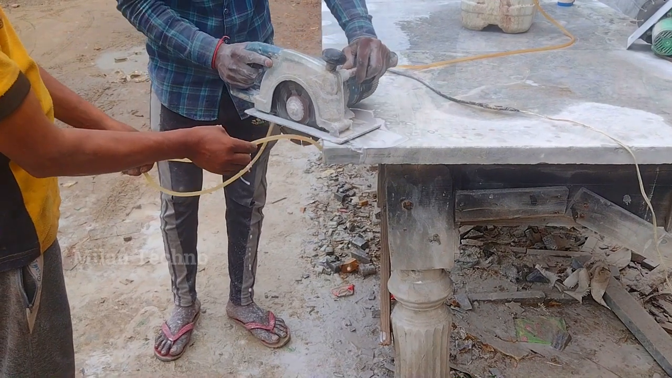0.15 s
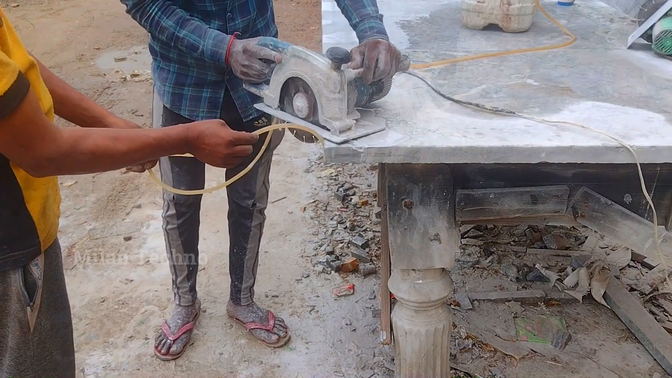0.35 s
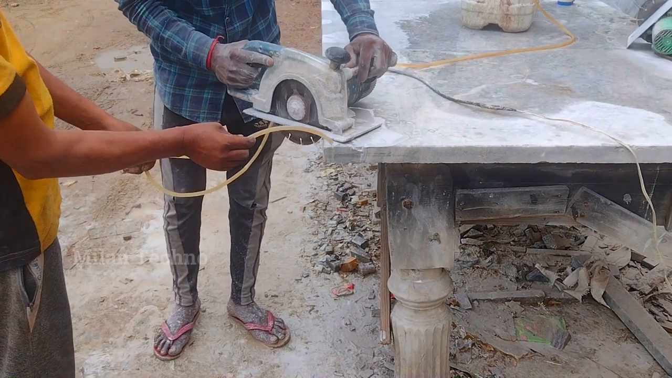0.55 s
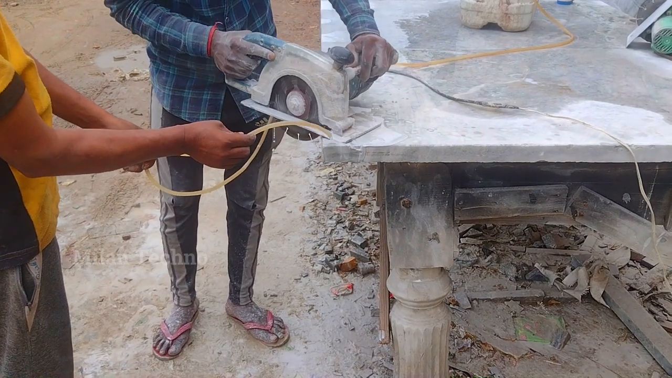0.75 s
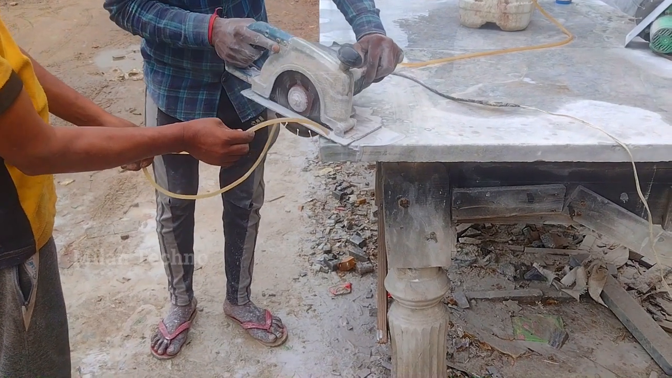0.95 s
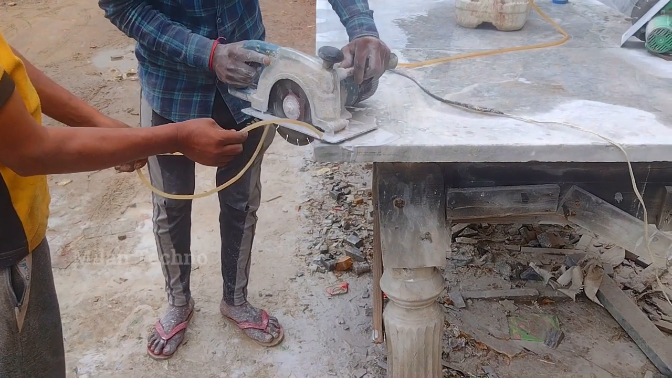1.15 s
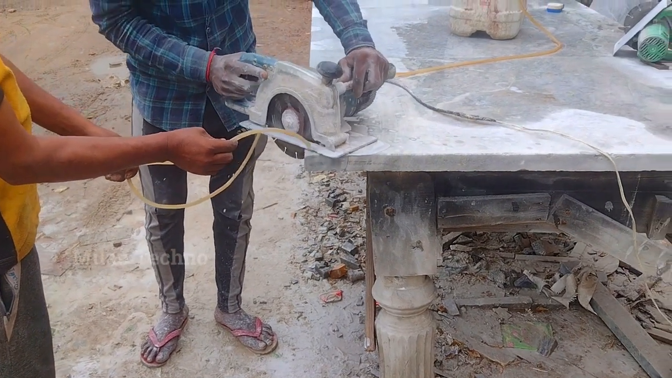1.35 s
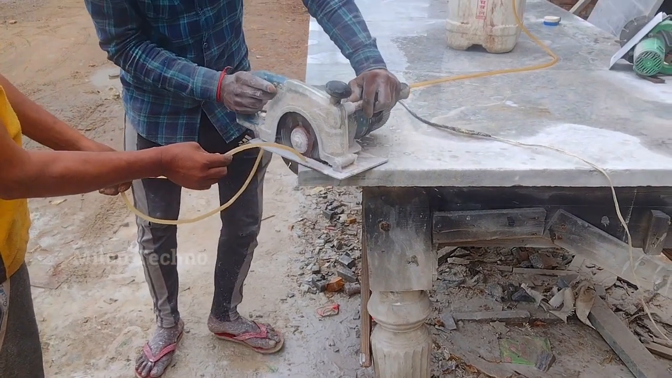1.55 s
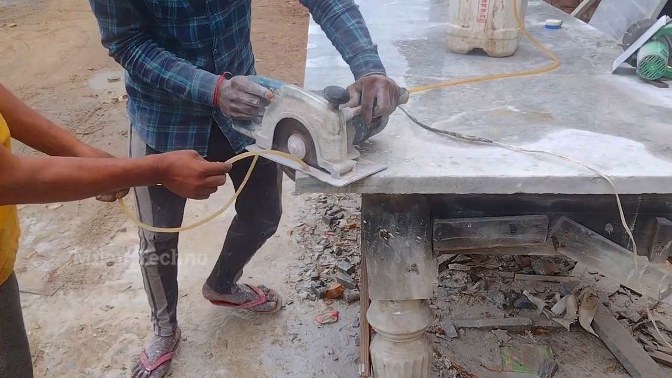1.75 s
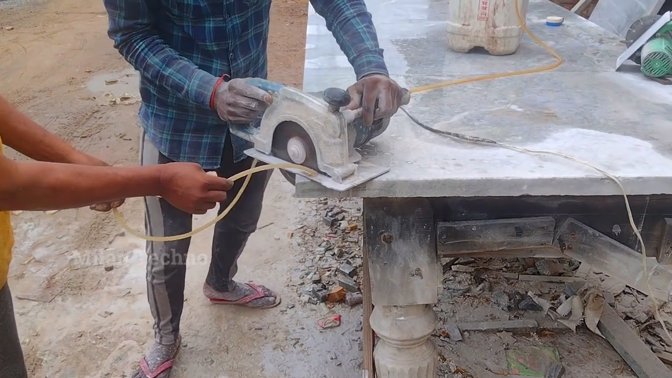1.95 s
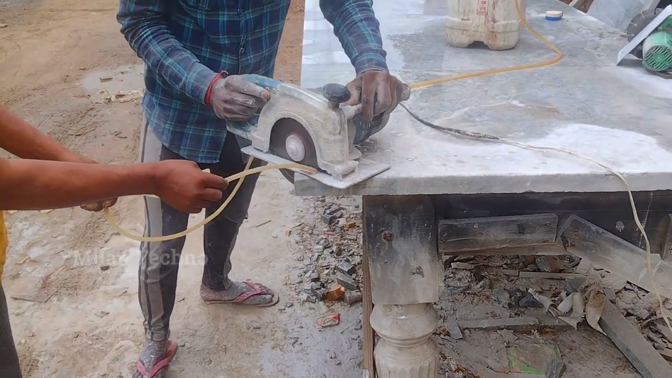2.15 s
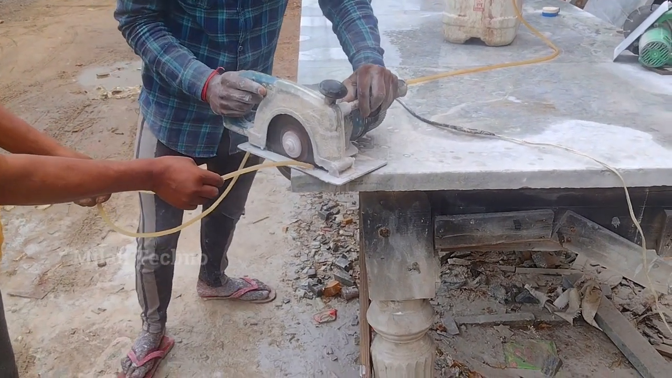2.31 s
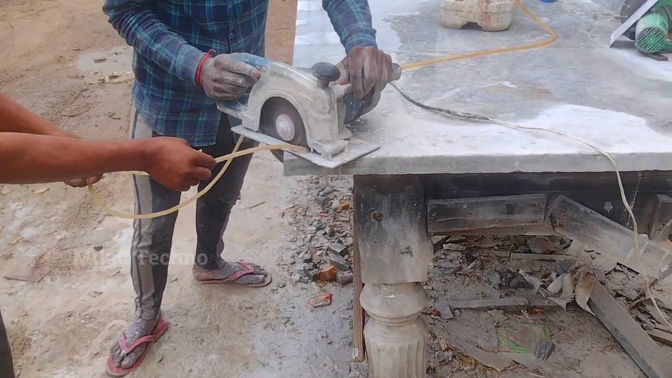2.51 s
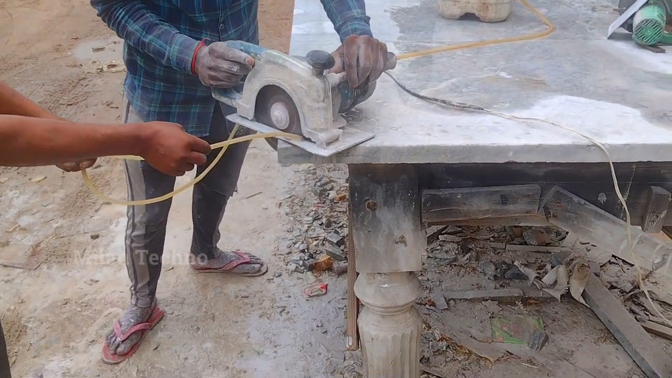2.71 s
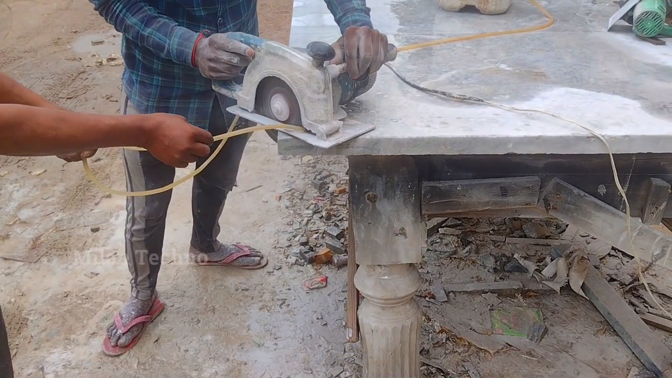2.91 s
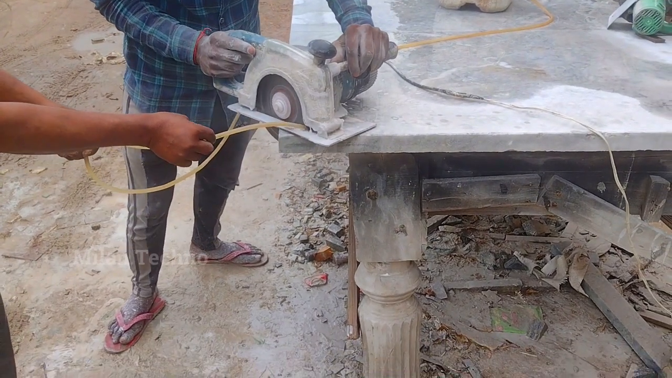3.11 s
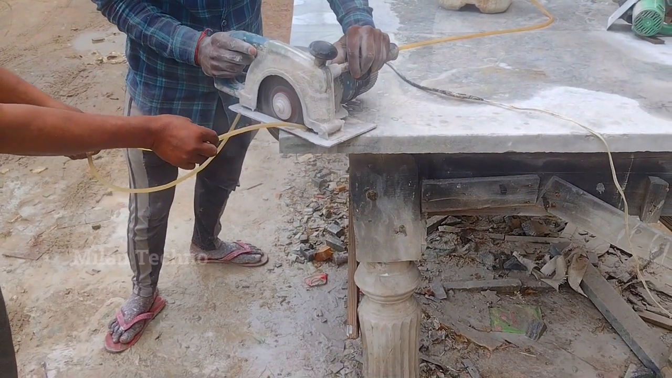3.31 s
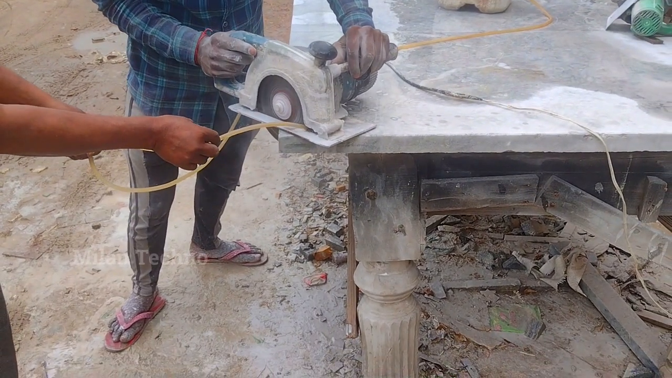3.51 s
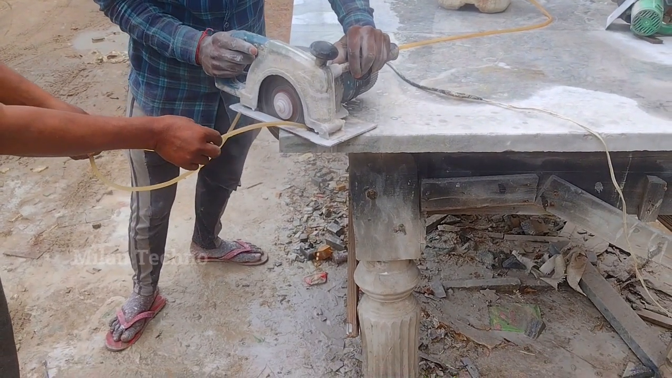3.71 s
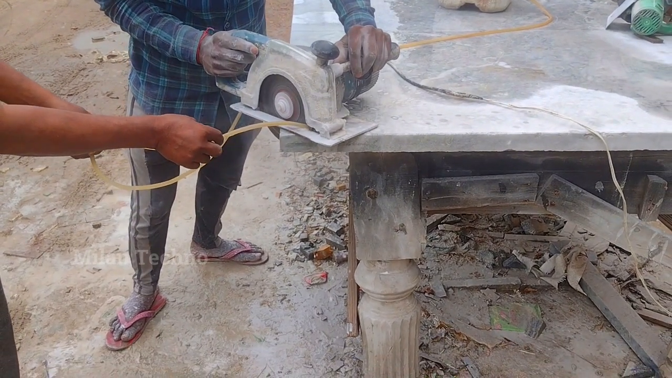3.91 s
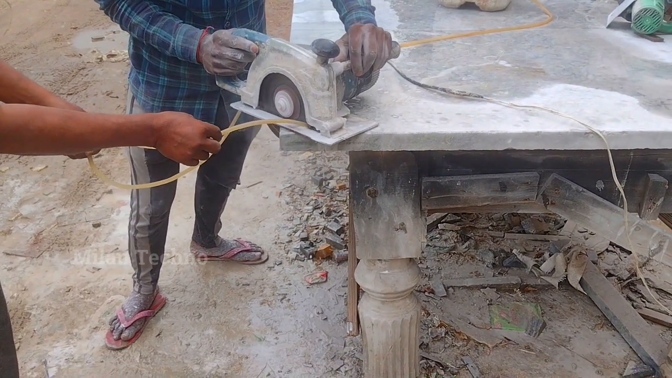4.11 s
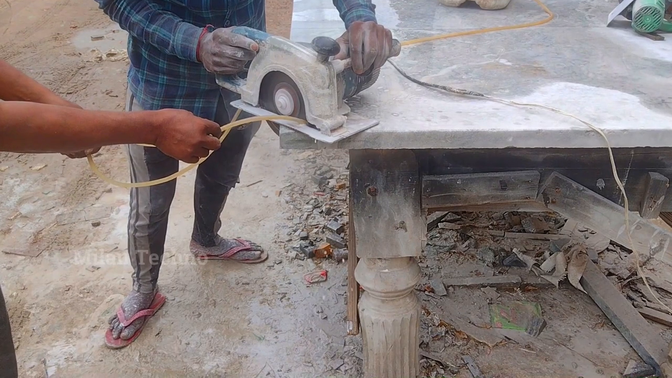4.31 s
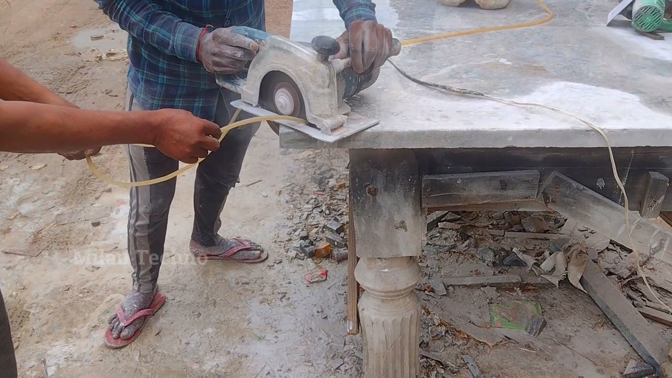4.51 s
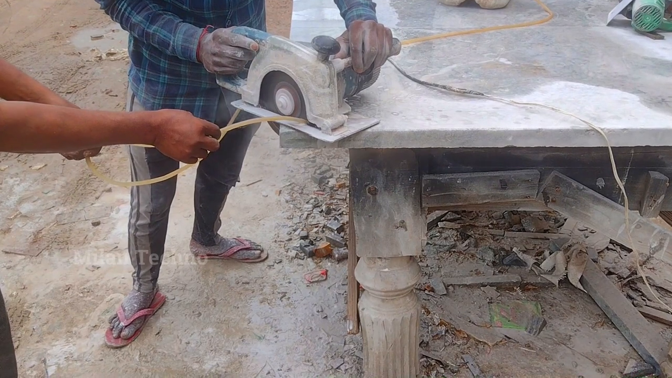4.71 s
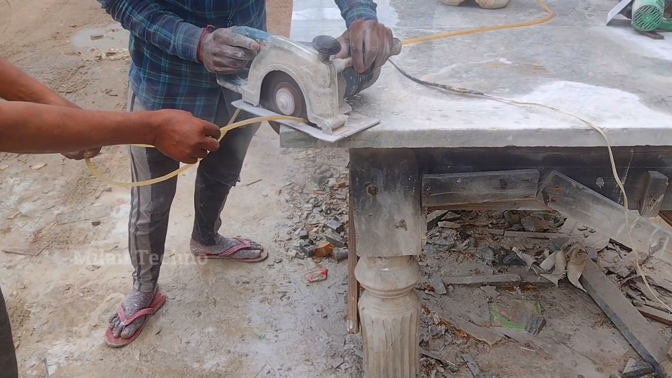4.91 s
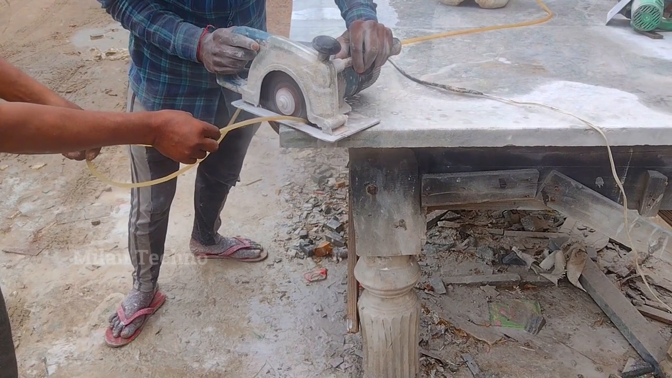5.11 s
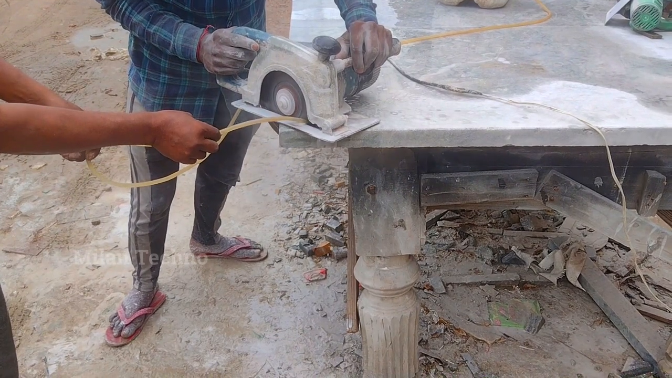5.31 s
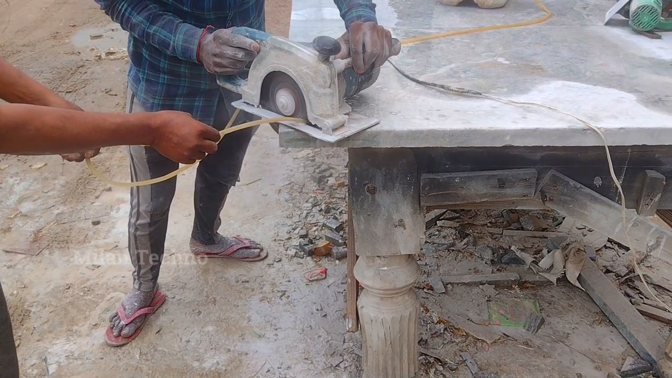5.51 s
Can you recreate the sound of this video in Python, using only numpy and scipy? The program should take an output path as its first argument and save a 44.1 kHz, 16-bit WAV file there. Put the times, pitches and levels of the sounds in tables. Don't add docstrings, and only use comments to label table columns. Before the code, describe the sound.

Insects trill as a metal plate clacks and drags over gritty stone; then a saw snaps on and roars into bright, ringing cutting hiss.

```python
import sys
import numpy as np
from scipy import signal
from scipy.fft import rfft, irfft
from scipy.io import wavfile

SR = 44100
rng = np.random.default_rng(int(sys.argv[2]) if len(sys.argv) > 2 else 0)


def voltage_ratio(decibels):
    exponent = np.asarray(decibels, float) / 20
    return 10 ** exponent


def digitize_waveform(pressure):
    field = np.atleast_2d(pressure).T
    bounded = np.clip(field, -1, 1)
    quanta = np.round(bounded * 32767).astype(np.int16)
    wavfile.write(sys.argv[1], SR, quanta)


N = 244755
T = np.arange(N) / SR
HZ = np.maximum(np.arange(N // 2 + 1) * SR / N, 1)
SWITCH_ON_S = 1.79
PORT_LAG_S = .000155

# start in seconds, plate level in dB, tick level in dB, ring t60 in seconds.
KNOCKS = [(0.297, -16, -22.5, 0.067), (0.314, -13.5, -34, 0.12), (0.613, -20.5, -29, 0.15),
          (0.677, -29, -44, 0.076), (0.706, -32, -53, 0.19), (0.82, -33, -30, 0.049),
          (0.841, -31.5, -72, 0.13), (0.893, -32.5, -62, 0.073), (1.036, -13.5, -30, 0.093),
          (1.075, -26.5, -52, 0.64), (1.121, -17, -34, 0.048), (1.19, -61, -29, 0.09),
          (1.275, -35, -32, 0.47), (1.328, -21.5, -50, 0.047), (1.513, -31, -65, 0.19),
          (1.543, -27, -34, 0.12), (1.605, -58, -32, 0.068), (1.628, -16, -51, 0.13),
          (1.725, -28, -43, 0.15), (1.79, -13.5, -23, 0.18)]


def rms_one(x):
    return x / np.sqrt(np.mean(x ** 2) + 1e-20)


def in_time(rows):
    s, *columns = np.transpose(rows)
    return [np.interp(T, s, c) for c in columns]


def at_hz(points, hz):
    table_hz, values = np.array(points).T
    return np.interp(np.log(hz), np.log(table_hz), values)


def drift(rate):
    r = np.exp(-80 * np.pi * rate / SR)
    noise = rng.standard_normal(N // 40 + 2002)
    slow = signal.lfilter([1], [1, -2 * r, r * r], noise)[2000:]
    return np.interp(np.arange(N) / 40, np.arange(len(slow)), rms_one(slow))


def fading(time_s):
    return np.exp(-np.maximum(T - SWITCH_ON_S, 0) / time_s)


def band(x, low_hz, high_hz):
    edges = [low_hz, min(high_hz, .45 * SR)]
    return signal.sosfilt(signal.butter(2, edges, "band", fs=SR, output="sos"), x)


def ports(x, pan_db, lag_s):
    n = np.arange(N)
    late = np.interp(n - lag_s * SR, n, x)
    return np.array([x * voltage_ratio(pan_db / 2), late * voltage_ratio(-pan_db / 2)])


def yard():
    # frequency in Hz, level in dB per Hz.
    colour = [(25, -16), (45, 3), (70, 1), (150, -6), (400, -12.5), (900, -18), (2000, -19.5),
              (4000, -24.5), (5500, -44), (9000, -32), (10500, -70)]
    both, *own = rfft(rng.standard_normal((3, N)))
    alike = 0.95 / (1 + (HZ / 900) ** 2)
    mixed = np.sqrt(alike) * both + np.sqrt(1 - alike) * own
    return voltage_ratio(-43.5) * rms_one(irfft(voltage_ratio(at_hz(colour, HZ)) * mixed, N))


def grit(per_s, size_db):
    sizes = voltage_ratio(size_db * np.minimum(rng.exponential(1, N), 4)) * rng.choice([-1, 1], N)
    return rms_one(sizes * (rng.random(N) < per_s / SR))


def body(force, modes, spread_db):
    out = np.zeros(N)
    for k, (hz, db, t60) in enumerate(modes):
        r = voltage_ratio(-60 / (max(t60, .003) * SR))
        w = 2 * np.pi * hz / SR
        push = force * voltage_ratio(db + spread_db * drift(14.0)) * np.sqrt(1 - r * r)
        ringing = signal.lfilter([0, np.sin(w)], [1, -2 * r * np.cos(w), r * r], push + 1e-18)
        out += (-1) ** k * ringing / np.sin(w) ** .5
    return out


def contact_levels():
    # time in seconds, drag in dB.
    slide = [
        (0.0, -48.5),
        (0.3, -48.5),
        (0.47, -61),
        (0.75, -90),
        (0.84, -46),
        (1.25, -45.5),
        (1.37, -34),
        (1.64, -34),
        (1.785, -94),
    ]
    flat_landings = [1, 9, 13, 17]
    edge_thud_db, flat_thud_db, switch_thud_db = -17.5, -6, -29
    grit_db, = in_time(slide)
    plate_db = -40.5 + 1.18 * (grit_db + 45)
    slab_db = -56 + 0.1 * (grit_db + 45)
    before = T < slide[-1][0]
    clumps = voltage_ratio(2.66 * drift(34)) * before
    tick = voltage_ratio(grit_db - 3.0) * clumps
    plate = voltage_ratio(plate_db - 12.5) * clumps
    thud = voltage_ratio(slab_db - 19.0) * before
    t = np.arange(int(.4 * SR)) / SR
    for k, (s, plate_peak, tick_peak, t60) in enumerate(KNOCKS):
        if k in flat_landings:
            thud_peak = plate_peak + flat_thud_db
        elif k < len(KNOCKS) - 1:
            thud_peak = plate_peak + edge_thud_db
        else:
            thud_peak = plate_peak + switch_thud_db
        at = slice(round(s * SR), round(s * SR) + len(t))
        tick[at] += voltage_ratio(tick_peak + 3.5 - 60 * t / max(t60, .01)) * np.minimum(t / 0.0042, 1)
        plate[at] += voltage_ratio(plate_peak - 6 - 60 * t / max(1.005 * t60, .01))
        thud[at] += voltage_ratio(thud_peak - 9.5 - 60 * t / max(1.2 * t60, .01)) * np.minimum(t / 0.0038, 1)
    return tick, plate, thud


def handling():
    # frequency in Hz, level in dB, t60 in seconds.
    guard_modes = [(3020, -4.5, 0.0022), (4260, -2, 0.016), (4695, 1, 0.025), (5360, 2.5, 0.012),
                   (6280, 1.5, 0.0063), (7450, 0.5, 0.0081), (9200, -5.5, 0.0044)]
    plate_modes = [(696.5, -4, 0.087), (799, -6, 0.2), (910, -13, 0.32), (1190, 4, 0.016),
                   (1393, -11, 0.27), (1426, -4, 0.042), (1694, 3.5, 0.052), (2110, 3, 0.022),
                   (2715, -23, 0.036), (507.3, -22.5, 0.39), (1003, -24, 0.34), (1145, -24, 0.79)]
    slab_modes = [(148, -5, .11), (272, 0, .09), (355, -1, .1), (490, -6, .08), (616, -7, .08)]
    tick, plate, thud = contact_levels()
    pan = np.where(T < SWITCH_ON_S, -1.5, -10)
    scatter = np.array([grit(9000, size_db=3.5), grit(4600, size_db=7.0)])
    rasp = voltage_ratio(-2) * band(band(tick * scatter, 1800, 10000), 1500, 12500)
    rasp = rasp + voltage_ratio(4) * band(plate * scatter, 900, 4200)
    contact = grit(6000, size_db=1.5)
    tick, plate = tick * contact, plate * contact
    thud = thud * rng.standard_normal(N)
    guard = voltage_ratio(-7.5) * body(tick, guard_modes, spread_db=4.0)
    steel = voltage_ratio(-10.5) * body(plate, plate_modes, spread_db=4.0) + voltage_ratio(7.0) * band(plate, 490, 1530)
    stone = voltage_ratio(-3) * body(thud, slab_modes, spread_db=1.5) + voltage_ratio(14) * band(thud, 130, 700)
    out = rasp * voltage_ratio([pan / 2, -pan / 2])
    out += ports(guard, pan + 15.7, 0.00013)
    out += ports(steel, 0.1 * pan, 0.00017)
    return out + ports(stone, -1.8, .00005)


def insects():
    # chirps per second, start in Hz, end in Hz, chirp length in seconds, level in dB,
    # first chirp in seconds, last in seconds.
    singers = [
        (51.5, 8450, 7650, .011, -49.5, .0075, 1.8),
        (50.5, 7400, 7250, .011, -55, .002, .5),
    ]
    out = np.zeros(N)
    for rate, start_hz, end_hz, length, db, first, last in singers:
        u = np.minimum((T - first) % (1 / rate) / length, 1)
        wave = np.sin(2 * np.pi * np.cumsum(start_hz + (end_hz - start_hz) * u) / SR)
        out += voltage_ratio(db + 1.5 * drift(12)) * np.sin(np.pi * u) ** 2 * wave * (T < last)
    return ports(out, 2.0, .0001)


def snaps():
    # start in seconds, level in dB, ring in Hz, t60 in seconds.
    clicks = [(0.047, -23.5, 3900, 0.01), (.138, -26, 6000, 0.0042), (.245, -28.5, 6230, .02),
              (.397, -32, 9000, .006), (.615, -11.5, 4760, 0.082), (0.614, -18.5, 1450, 0.087),
              (1.038, -12, 1207, 0.066), (1.325, -27, 150, .15), (.678, -26, 1180, 0.099),
              (.708, -28, 1186, 0.1), (0.847, -30, 1205, .08), (.9, -32, 1210, .07),
              (.671, -32, 7000, .006), (0.888, -35, 6900, .006), (0.934, -34, 6850, 0.0051),
              (1.122, -3, 2060, 0.0023), (1.631, 8, 1120, 0.0026), (1.726, -12.5, 5640, 0.01),
              (1.79, -3, 1230, 0.023)]
    out, t = np.zeros(N), np.arange(int(.15 * SR)) / SR
    for s, db, hz, t60 in clicks:
        out[round(s * SR):][:len(t)] += voltage_ratio(db - 60 * t / t60) * np.sin(2 * np.pi * hz * t)
    return ports(out, 2.8, 0.00014)


def turns():
    # time in seconds, turns per second lost.
    feed = [
        (2.65, 0),
        (3.05, 2.9),
        (3.5, 4.9),
        (4.4, 6.5),
        (5.2, 5.4),
        (5.55, 4.2),
    ]
    free_turns_per_s, kick_turns_per_s, run_up_s = 66.5, 25, .29
    speed = free_turns_per_s - (free_turns_per_s - kick_turns_per_s) * fading(run_up_s) - in_time(feed)[0]
    return np.cumsum(speed * (1 + .0008 * drift(12))) / SR


def rim(angle, spread_db):
    orders = voltage_ratio(spread_db * rng.standard_normal(200)) * np.exp(2j * np.pi * rng.random(200))
    pattern = irfft(orders, 8192)
    passing = np.interp(angle % 1 * 8192, np.arange(8192), pattern)
    return rms_one(passing) * np.sqrt(200 * 61 / (SR / 2))


def hiss_spectra(shake):
    # centre in Hz, width in Hz.
    bands = [(1600, 300), (3160, 220), (4040, 330), (4330, 350), (4800, 450), (5670, 400), (6335, 330),
             (6800, 400), (7930, 550), (9600, 800), (13100, 600)]
    # left in dB, right in dB.
    heights = [(4, 5.6), (-8, 8.5), (6.5, 0.52), (6.5, 4.7), (4.5, 1.2), (5, 8.2), (2, 3.3), (-2, 0.95),
               (-0.5, 2.9), (-1, 4), (-20, 1.9)]
    # frequency in Hz, level in dB per Hz.
    hiss_colour = [(700, -25.5), (1400, -15), (2500, -3.5), (3500, -3.5), (4500, 1.5), (6000, -4),
                   (8000, 0.5), (11000, -3.5), (13000, -7.5), (16000, -10)]
    # frequency in Hz, left over right in dB.
    balance = [(1000, 2), (4000, -4), (6000, 7.5), (8000, 0.5), (15000, -1.5)]
    # frequency in Hz, share common to both ports.
    direct_share = [(700, 0.3), (2500, 0.05), (4000, 0.73), (5700, 0.75), (7500, 0.29), (10000, 0.11),
                    (14000, 0.053)]
    # frequency in Hz, share that repeats every turn.
    repeat_share = [(700, .05), (1300, .12), (3000, .2), (4000, .3), (6500, .25), (9000, .08), (12000, 0)]
    direct, *diffuse = rfft(rng.standard_normal((3, N)))
    repeat, again = rfft(shake), at_hz(repeat_share, HZ)
    share = np.clip(at_hz(direct_share, HZ), 0, 1)
    slab_echo = 1 + .32 * np.exp(-2j * np.pi * HZ * .00141)
    late = np.exp(-2j * np.pi * HZ * PORT_LAG_S) * slab_echo
    sides = []
    for side, path in enumerate([1, late]):
        power = 1
        for (mid, width), db in zip(bands, heights):
            power = power + voltage_ratio(2 * db[side]) / (1 + (2 * (HZ - mid) / width) ** 2) ** 2
        tilt_db = at_hz(hiss_colour, HZ) + (1.5 - side) * at_hz(balance, HZ)
        colour = voltage_ratio(tilt_db) * np.sqrt(power)
        fresh = np.sqrt(share) * direct * path + np.sqrt(1 - share) * diffuse[side]
        sides.append(colour * (np.sqrt(again) * repeat * path + np.sqrt(1 - again) * fresh))
    return np.array(sides)


def blade_hiss(angle, shake):
    load_db = -16.5 - 11 * fading(0.076)
    sides = hiss_spectra(shake)
    low = 1 / (1 + (HZ / 3600) ** 12)
    high = 1 - 1 / (1 + (HZ / 7400) ** 8)
    growl, ring, spray = (irfft(sides * part, N) for part in (low, 1 - low - high, high))
    shriek = irfft(sides / (1 + ((HZ - 5670) / 280) ** 4), N)
    ring = ring - .55 * np.clip((2.7 - T) / .6, 0, 1) * shriek
    early = irfft(sides / (1 + ((HZ - 5380) / 170) ** 4), N)
    ring = ring + .7 * np.exp(-((T - 2.35) / 0.2) ** 2) * early
    spray_db = 3.5 * fading(0.78) - 1.5
    hiss = rms_one(ring + spray * voltage_ratio(spray_db))
    growl = rms_one(growl) * voltage_ratio(-13.5 + 2.0 + 0.8 * drift(18.0))
    throb = 1 + .08 * np.sin(2 * np.pi * angle)
    return voltage_ratio(load_db + 5.5 + 0.1 * drift(2.6)) * throb * (hiss + growl)


def motor(angle, shake):
    # multiple of the spindle speed, left in dB, right in dB.
    orders = [(12, -55, -51), (14, -50, -46), (25, -47, -39), (27, -42, -47), (28, -46, -48),
              (29, -48, -42), (37, -45, -45), (38, -47, -47), (45, -50, -43), (50, -48, -44),
              (52, -48, -42)]
    # frequency in Hz, width in Hz, left in dB, right in dB.
    housing = [(1525, 60, -42, -35), (1665, 70, -40, -44), (1830, 90, -47, -40), (2060, 50, -43, -46),
               (2260, 110, -42, -42), (2750, 60, -48, -42), (3170, 120, -47, -40)]
    settled = np.clip((T - 2.3) / .9, 0, 1)
    eased = np.clip((5.5 - T) / 1.0, .35, 1)
    out = np.zeros((2, N))
    for k, left, right in orders:
        swell = settled * (eased if 20 < k < 30 else 1)
        out += np.sin(2 * np.pi * k * angle) * swell * voltage_ratio(2.5 * drift(5) + [[left], [right]])
    for hz, width, left, right in housing:
        r = np.exp(-np.pi * width / SR)
        tone = signal.lfilter([1, 0, -1], [1, -2 * r * np.cos(2 * np.pi * hz / SR), r * r], shake)
        tone = rms_one(tone) * voltage_ratio((left + right) / 2 + 2 * drift(2))
        out += ports(tone, left - right, PORT_LAG_S + .0001)
    return voltage_ratio(7) * out


def scene():
    running = np.clip((T - KNOCKS[-1][0] - .001) / 0.0051, 0, 1)
    angle = turns()
    shake = rim(angle, spread_db=1.5)
    saw = running * (blade_hiss(angle, shake) + motor(angle, shake))
    return yard() + handling() + insects() + snaps() + saw


def low_pass(x):
    return signal.sosfilt(signal.butter(12, 15840, fs=SR, output="sos"), x)


def record(dry):
    treble_lift, overload = .45, 0.23
    lifted = signal.lfilter([1, -treble_lift], [1], dry)
    squashed = lifted / (1 + np.abs(lifted / overload) ** 4.0) ** (1 / 4.0)
    level = signal.lfilter([1], [1, -treble_lift], squashed)
    level = signal.sosfilt(signal.butter(2, 90, "high", fs=SR, output="sos"), level)
    level = signal.sosfilt(signal.ellip(12, .3, 70, 15690, fs=SR, output="sos"), level)
    return low_pass(level)


dry = scene()
out = record(dry)
digitize_waveform(out)
```